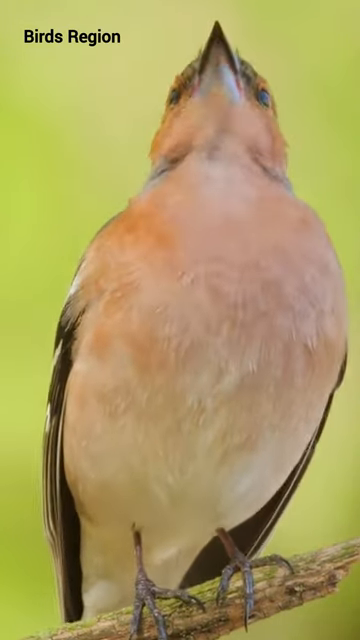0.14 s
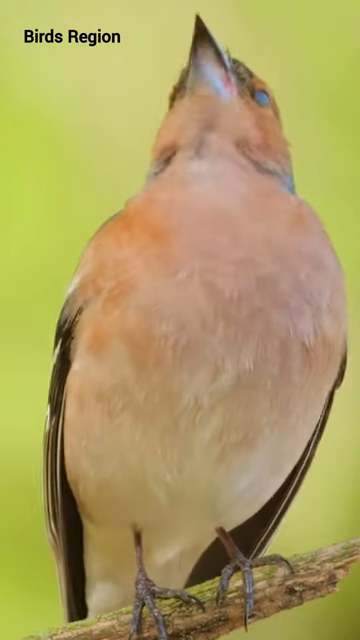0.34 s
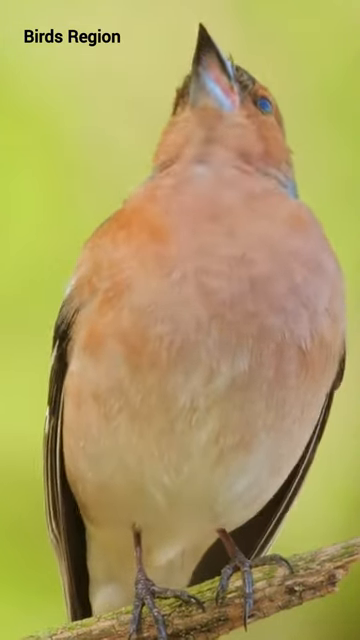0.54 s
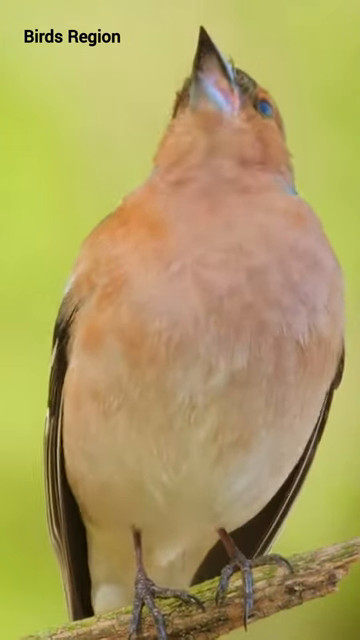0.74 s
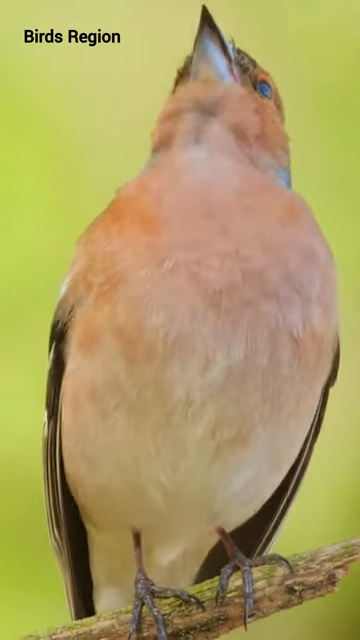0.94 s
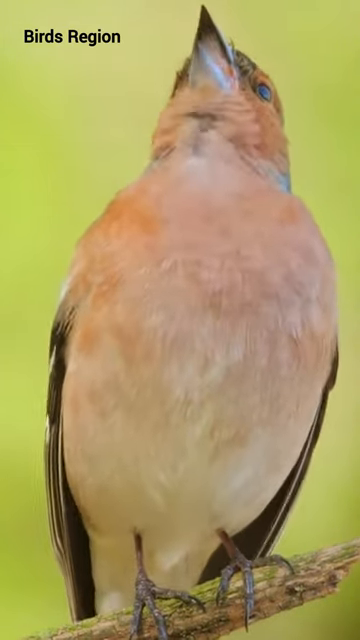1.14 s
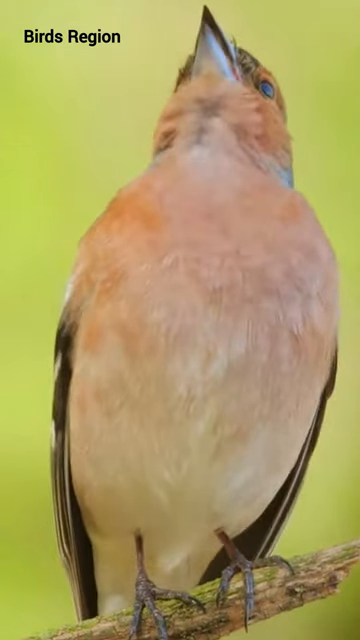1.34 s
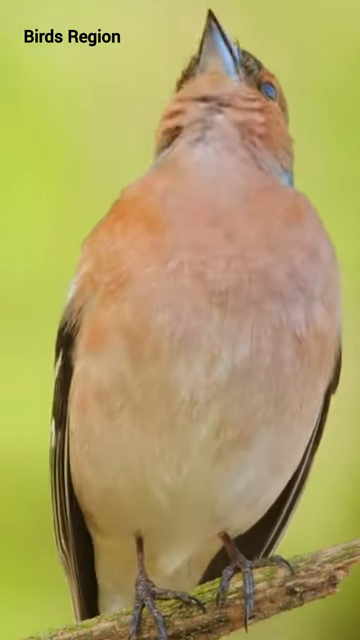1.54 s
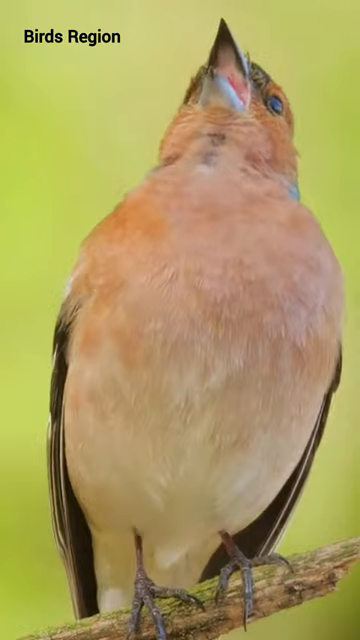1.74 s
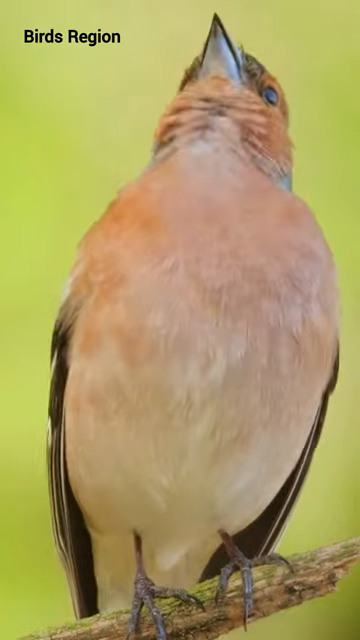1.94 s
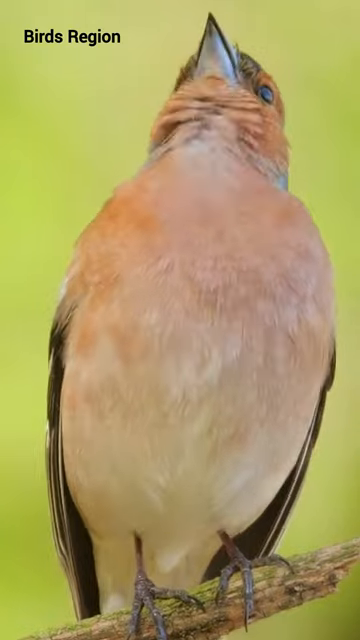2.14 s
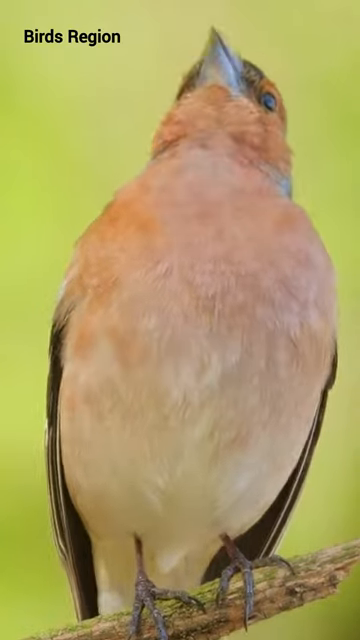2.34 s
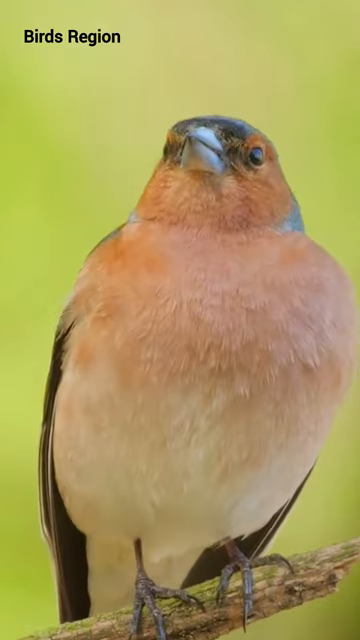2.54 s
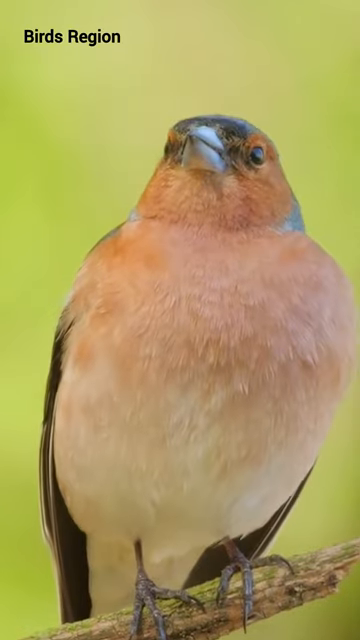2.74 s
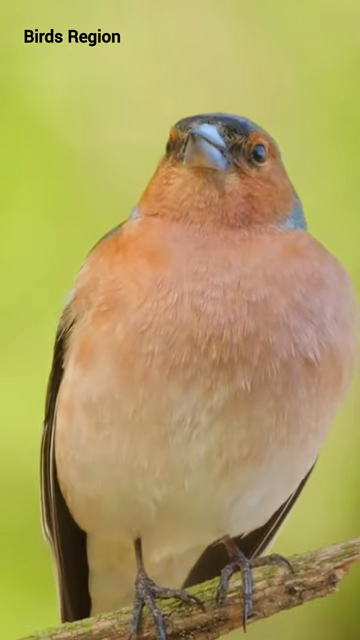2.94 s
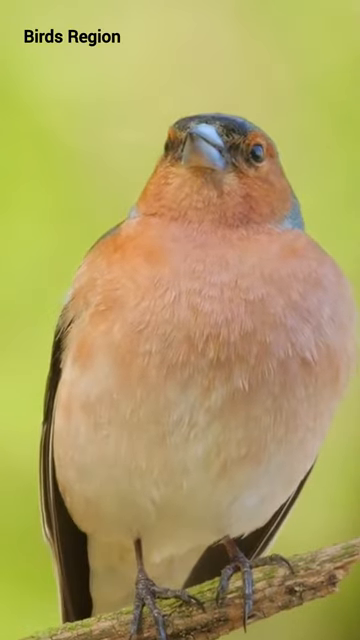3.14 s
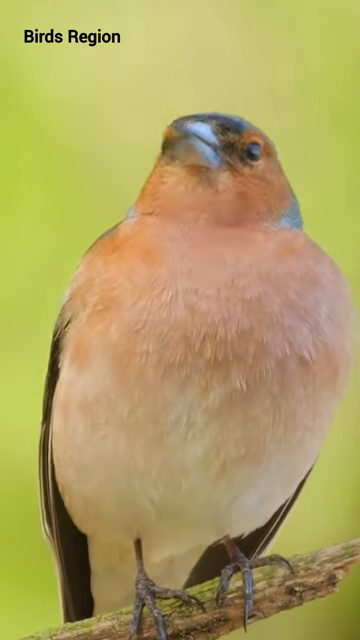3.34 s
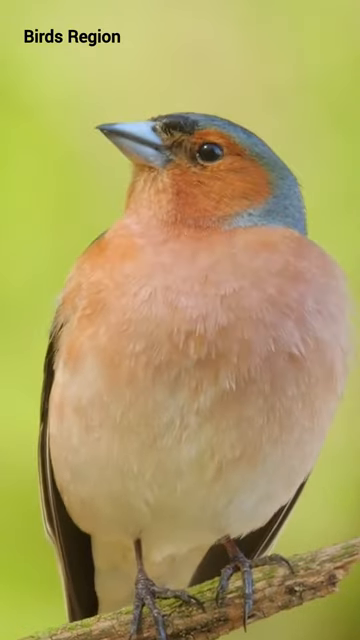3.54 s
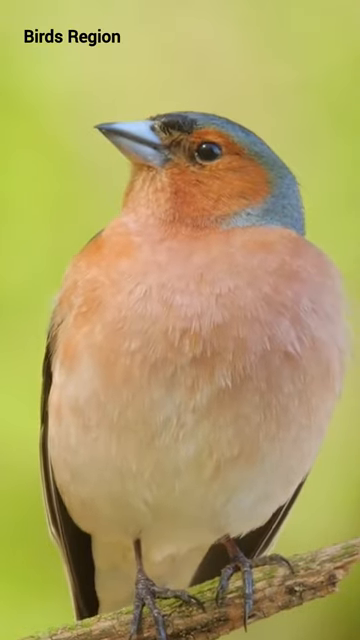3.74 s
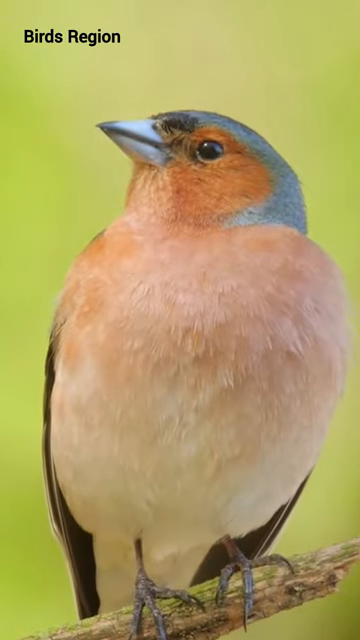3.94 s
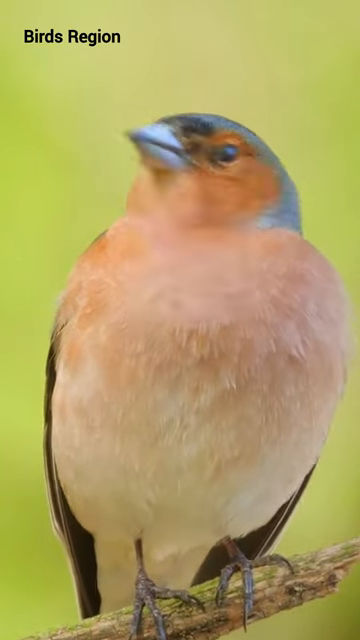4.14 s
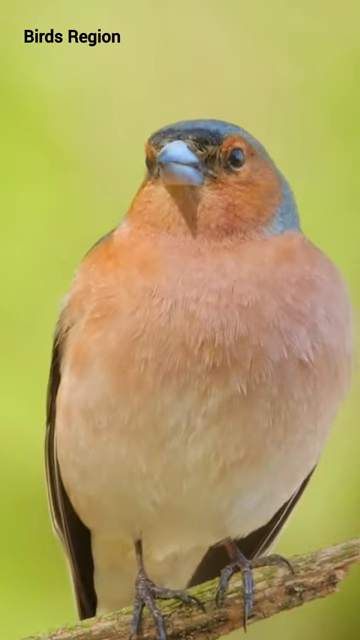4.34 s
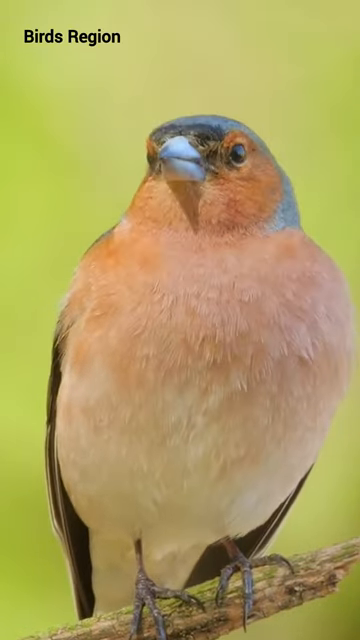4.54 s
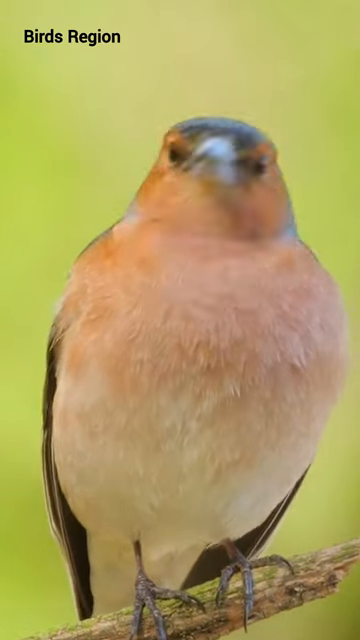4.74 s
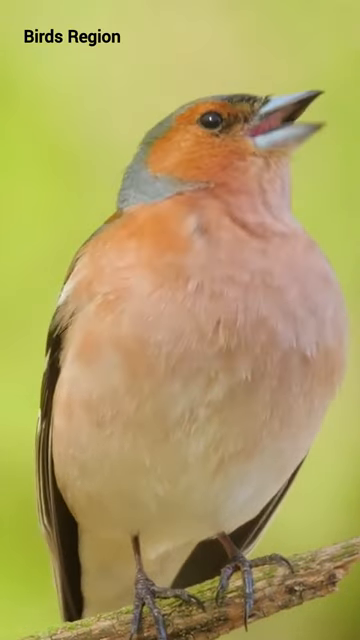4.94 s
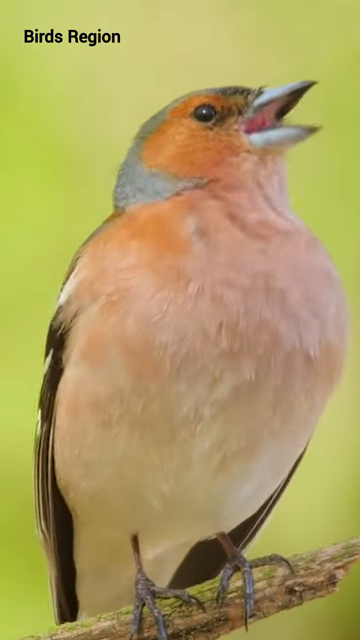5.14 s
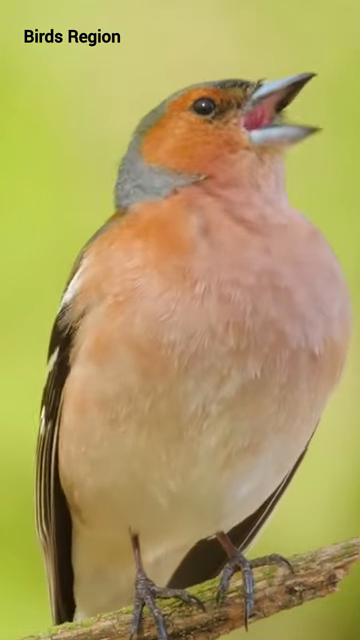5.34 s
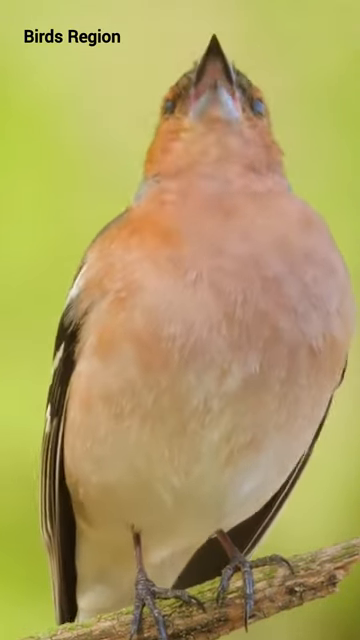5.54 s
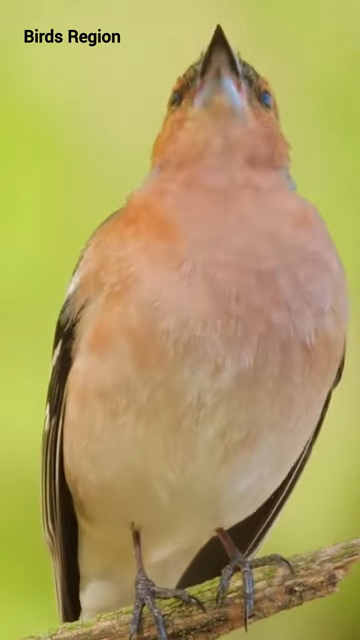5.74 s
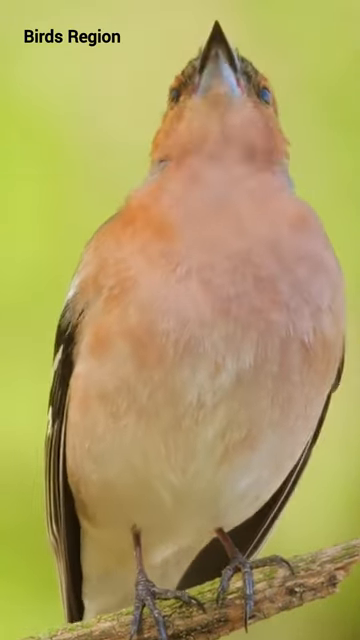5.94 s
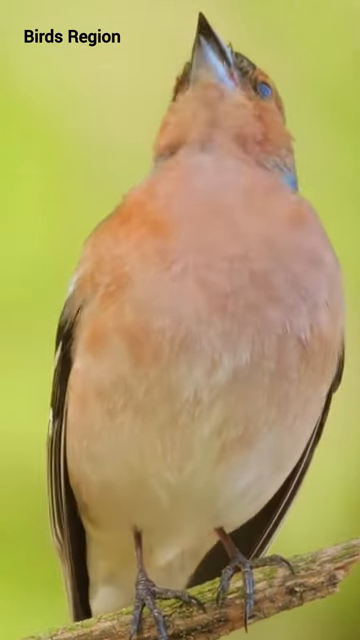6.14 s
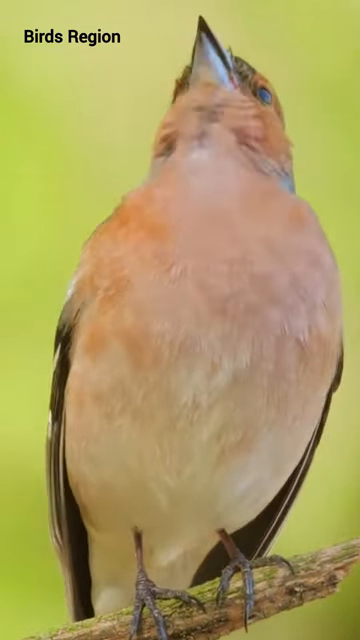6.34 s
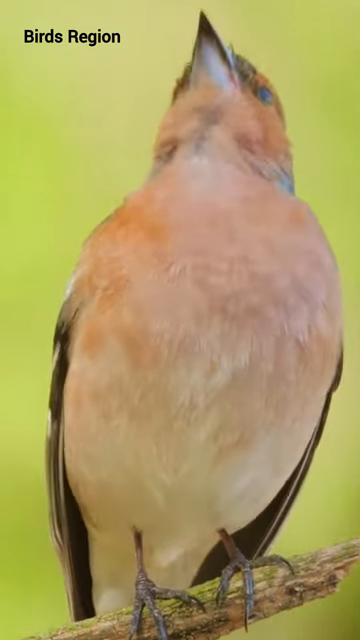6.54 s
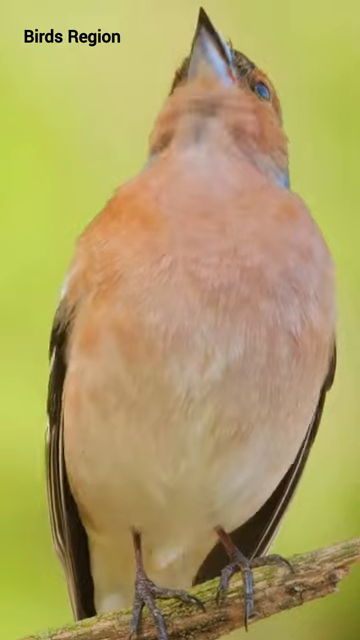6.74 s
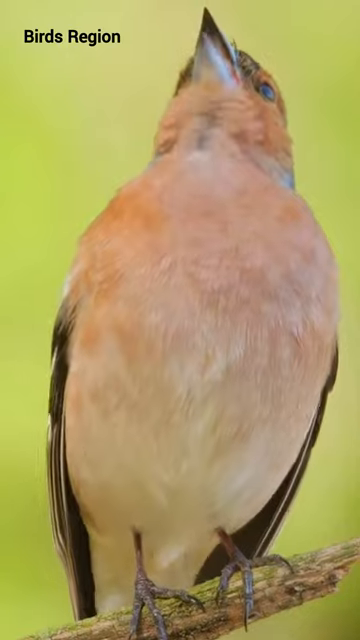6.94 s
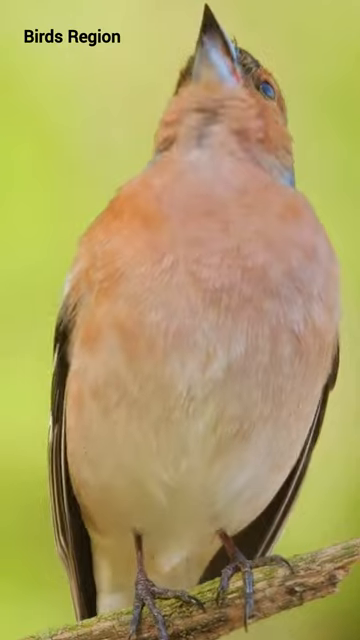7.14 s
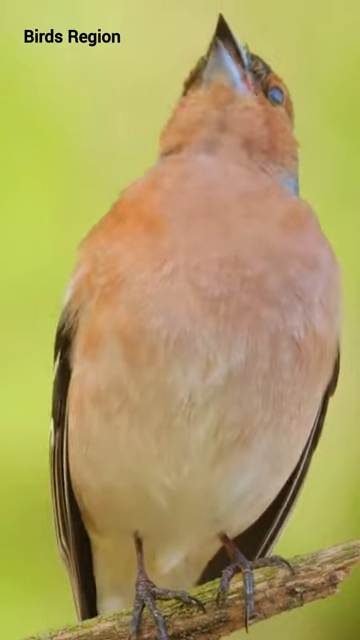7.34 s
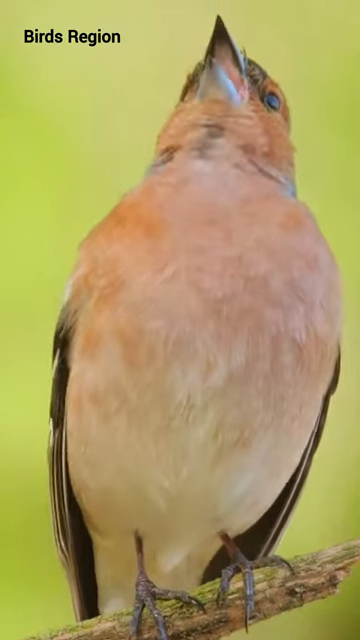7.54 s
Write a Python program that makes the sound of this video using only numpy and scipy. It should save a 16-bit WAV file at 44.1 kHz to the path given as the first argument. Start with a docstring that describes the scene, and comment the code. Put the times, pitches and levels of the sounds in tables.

```python
"""A chaffinch sings close by in a wood: thin ticks that swell, five steep down-slurs, hooked notes, a buzz and flourish.
Each run repeats one gliding whistle that stutters once or twice; branches, foliage and a trunk throw it back.
The first song, heard from its down-slurs on, stops abruptly with its ring; a soft twitter made of zigzags with
two-voiced endings follows, then the song comes round again from its ticks. Deeper in the wood lie faint slurs,
long whistles, one short high rustle and remote chirps, over a faint steady hush of coloured noise."""
import sys
import numpy as np
from scipy import signal
from scipy.fft import rfft, irfft
from scipy.io import wavfile
from scipy.ndimage import uniform_filter1d

SR = 44100
rng = np.random.default_rng(int(sys.argv[2]) if len(sys.argv) > 2 else 0)


def output_pcm(signal):
    """Save a mono or channel-first signal as 16-bit PCM at the path in sys.argv[1].

    Samples are clipped to [-1, 1] before scaling.
    """
    pcm = np.clip(np.atleast_2d(signal).T, -1, 1) * 32767
    wavfile.write(sys.argv[1], SR, np.round(pcm).astype(np.int16))


N = 338688

# Gesture shapes, named for how they sound: (share of the length [0-1], pitch before transposing [Hz], level [dB])
LISP = [(0, 5427, -3), (.25, 6113, 2.5), (.6, 6286, -3), (1, 6643, -12.5)]
SIGH = [(0, 2490, -16.5), (0.071, 3079, 1.5), (0.149, 3023, -4.5), (0.319, 2677, -4.5), (0.481, 2380, -12),
        (.68, 2300, -15), (0.796, 1750, -29.5), (1, 1150, -45)]
BUZZ = [(0, 4750, -12.5), (.2, 4374, -3.5), (.3, 4266, 3.5), (.58, 4000, 0.5), (1, 4000, -0.5)]
SQUEAK = [(0, 3370, 3), (.5, 5750, -8), (1, 7300, -26)]
FLOURISH = [(0, 3433, -15), (0.053, 3812, -2.5), (0.13, 3230, -6.5), (0.228, 2785, -9.5),
            (0.438, 2471, -19.5), (.57, 2900, -6.5), (0.797, 3284, -7), (1, 3380, -2.5)]
SLUR = [(0, 3712, -0.5), (0.602, 3360, -9.5), (1, 2610, -11)]
ARCH = [(0, 3500, -2), (0.251, 4420, -2), (0.551, 3600, -7.5), (1, 2514, -3)]
HIGH_SLUR = [(0, 4164, -14), (.35, 4190, -1), (.7, 3900, -2), (1, 3290, -12)]
LIFT = [(0, 3220, -5), (0.348, 3300, 0.5), (.7, 4100, 0.5), (1, 3950, -6)]
HOLD = [(0, 2110, 9.5), (.15, 1925, -9), (1, 1957, -15.5)]
ZIGZAG = [(0, 3550, -6), (.7, 3723, 7), (1, 3700, 5)]


def undb(db):
    """Decibels to gain."""
    return 10 ** (np.asarray(db) / 20)


def colour(x, points, share=1):
    """Filter by a (frequency [Hz], level [dB]) curve, or by a share of its decibels."""
    hz, db = np.transpose(points)
    bins_hz = np.maximum(np.arange(N // 2 + 1) * SR / N, 1)
    curve_db = np.interp(np.log(bins_hz), np.log(hz), db)
    return irfft(rfft(x) * undb(share * curve_db), N)


def wander(size, rate_hz):
    """Random drift around zero: straight lines between normal draws, rate_hz draws a second."""
    knots = rng.standard_normal(int(size * rate_hz / SR) + 2)
    return np.interp(np.arange(size) * rate_hz / SR, np.arange(len(knots)), knots)


def add(track, s, sound):
    """Mix a sound in at a time in seconds, trimming what falls outside the track."""
    start = int(s * SR)
    first, last = max(start, 0), min(start + sound.shape[-1], N)
    if last > first:
        track[..., first:last] += sound[..., first - start:last - start]


def stroke(shape, length_s, pitch=1, waver=0.0094, fade_s=0.0019):
    """One gesture, as a syrinx makes it: a pure tone that glides, and in some shapes trills."""
    # trills: (shape, rate [Hz], swing before transposing [Hz], softening at the top of the swing [0-1],
    # spread of the rate [0-1])
    trills = [(LISP, 300, 800, 0.58, 0.36), (BUZZ, 190, 590, 0.48, 0.25),
              (FLOURISH, 178, 433, 0.073, 0.067), (ZIGZAG, 90, 516, 0.12, 0.27)]
    size = int(length_s * SR)
    t = np.arange(size) / SR
    share, hz, db = np.transpose(shape)
    hz = uniform_filter1d(np.interp(t / length_s, share, hz), size=60)
    db = uniform_filter1d(np.interp(t / length_s, share, db), size=60)
    edges = np.clip(np.minimum(t, length_s - t) / fade_s, 0, 1)
    gain = undb(db) * np.sin(np.pi / 2 * edges) ** 2
    for trilled, rate_hz, swing_hz, dip, spread in trills:
        if shape == trilled:
            uneven_hz = rate_hz * (1 + spread * wander(size, rate_hz))
            swing = np.sin(2 * np.pi * np.cumsum(uneven_hz) / SR)
            hz = hz + swing_hz * swing
            gain = gain * (1 - dip * (1 + swing) / 2)
    sounding_hz = pitch * hz * (1 + waver * wander(size, 900))
    return gain * np.sin(2 * np.pi * np.cumsum(sounding_hz) / SR)


def stutter(sound, skips, fade_s=0.02):
    """At each skip the note jumps back a little and repeats itself, the old strand fading under the new."""
    for at_s, back_s in skips:
        gap = np.zeros(max(int(back_s * SR), 0))
        old = np.concatenate([sound, gap])
        new = np.concatenate([gap, sound])
        t = np.arange(len(old)) / SR
        turn = np.pi / 2 * np.clip((t - at_s) / fade_s + .5, 0, 1)
        sound = old * np.cos(turn) + new * np.sin(turn)
    return sound


def phrase():
    """One song cycle, dry: three runs that each repeat one stuttering whistle, and a closing figure."""
    # shapes of the three runs: (share of the length [0-1], pitch [Hz], level [dB])
    tick = [(0, 5300, -27.5), (0.252, 6630, -15.5), (.37, 6930, -24), (.42, 3695, -34), (.6, 4750, -15.5),
            (0.713, 4964, 1), (.81, 6003, -20.5), (0.879, 4310, -5.5), (1, 2745, -26)]
    plunge = [(0, 7620, -26), (.05, 7110, -22.5), (.15, 5254, -6), (.26, 4425, -6), (.51, 3975, -3),
              (.66, 3553, 2), (.86, 2991, -3), (.92, 2398, -19), (1, 1197, -45)]
    hook = [(0, 2330, -13.5), (.24, 2910, -4.5), (.5, 3590, 1), (0.551, 4470, -12), (.6, 4810, -17.5),
            (0.707, 3470, 1), (.79, 2970, -0.5), (.88, 2420, -16.5), (1, 1136, -44)]
    # notes of the runs: (time [s], level [dB], stutters [(time into the note [s], skip back [s])])
    ticks = [(5.063, -35.5, [(.023, .008)]), (5.169, -27.5, [(.035, 0.012)]), (5.282, -25, [(.045, 0.011)]),
             (5.381, -20, [(.012, .017), (.063, 0.024)]), (5.486, -20, [(.043, 0.0091)]),
             (5.588, -18.5, [(.031, 0.015), (.059, 0.016)]), (5.697, -16, [(.037, .018)])]
    plunges = [(.133, -17, [(.039, .012), (.091, .021)]), (.345, -16.5, [(.033, .019), (.085, .014)]),
               (.571, -15, [(.033, .018), (.093, .018)]), (.798, -14.5, [(.029, .01), (.075, .013)]),
               (1.026, -14, [(.053, .014), (.102, 0.02)])]
    hooks = [(1.222, -14.5, [(.045, .014)]), (1.383, -14, [(.021, 0.0072), (.047, .013)]),
             (1.543, -13, [(.023, .017), (.072, .019)])]
    # closing figure: (time [s], length [s], level [dB], transposition [ratio], shape)
    closing = [(1.727, .14, -13.5, 1, SIGH), (1.943, 0.17, -17, 1, BUZZ), (2.186, .014, -34, 1, SQUEAK),
               (2.204, 0.018, -29.5, 1, SQUEAK), (2.207, 0.018, -36, .62, SQUEAK),
               (2.216, 0.16, -14.5, 1, FLOURISH)]
    tick_s, plunge_s, hook_s = .041, 0.075, .0604  # lengths before stuttering
    lisp_lead_s, lisp_s, lisp_db = 0.054, .056, -18.5  # thin lead-in; level relative to its plunge

    voice = np.zeros(N)
    for notes, shape, length_s in ((ticks, tick, tick_s), (plunges, plunge, plunge_s), (hooks, hook, hook_s)):
        for s, db, skips in notes:
            add(voice, s, undb(db) * stutter(stroke(shape, length_s), skips))
    for s, db, _ in plunges:
        add(voice, s - lisp_lead_s, undb(db + lisp_db) * stroke(LISP, lisp_s))
    for s, length_s, db, pitch, shape in closing:
        add(voice, s, undb(db) * stroke(shape, length_s, pitch))
    return voice


def overtones(voice, second_db=-41, third_db=-42, fourth_db=-57, growth=.4):
    """Harmonics at multiples of the whistle's phase, which gain on it as it gets louder."""
    # tone of the overtones as they leave the beak: (frequency [Hz], level [dB])
    beak = [(5000, -11.5), (8000, -8), (9200, -20.5), (10400, 2), (12500, 12), (15000, 7)]
    tone = signal.hilbert(voice)
    size, phase = np.abs(tone), np.angle(tone)
    harmonics = sum(undb(db) * np.cos(k * phase) for k, db in enumerate((second_db, third_db, fourth_db), 2))
    return colour(size * (size / size.max()) ** growth * harmonics, beak)


def wood(x, scatter_db, t60=0.65, treble_t60=0.3, treble_hz=4800, side_db=-14):
    """Direct sound, a few clear echoes and a grainy tail from leaves and twigs, nearly alike in both ears."""
    # branches close by: (delay [s], level [dB])
    branches = [(.0014, -18), (.00272, -12), (0.0109, -13.5)]
    trunk_s, trunk_db = 0.077, -23.5  # a later, duller echo
    t = np.arange(SR) / SR
    low_pass = signal.butter(2, treble_hz, fs=SR, output="sos")

    grains = rng.standard_normal((2, SR)) * (rng.random((2, SR)) < .03)
    twigs = grains * (t > branches[0][0])
    low = signal.sosfiltfilt(low_pass, twigs)
    # foliage swallows the treble first
    low_tail = low * np.exp(-np.log(1000) * t / t60)
    treble_tail = (twigs - low) * np.exp(-np.log(1000) * t / treble_t60)
    tail = low_tail + treble_tail
    mid, side = tail * undb(scatter_db) / np.sqrt(np.sum(tail ** 2, axis=1, keepdims=True))

    trunk = signal.unit_impulse(SR, int(trunk_s * SR))
    mid = mid + undb(trunk_db) * signal.sosfiltfilt(low_pass, trunk)
    mid[0] += 1  # direct sound
    for delay_s, db in branches:
        mid[int(delay_s * SR)] += undb(db)
    return np.array([signal.fftconvolve(x, mid + sign * undb(side_db) * side)[:N] for sign in (1, -1)])


def chaffinch():
    """The same song comes round at a steady interval; the first breaks off together with its ring."""
    repeat_s, break_s, resume_s = 5.7256, 2.381, 5
    voice, songs = phrase(), np.zeros((2, N))
    song = wood(voice, scatter_db=-12, treble_t60=.38)
    # the raised beak beams the overtones into the leaves, so they arrive mostly scattered
    song = song + wood(overtones(voice), scatter_db=5.5, treble_t60=0.044)
    for turn in (-1, 0, 1):
        add(songs, turn * repeat_s, song)
    t = np.arange(N) / SR
    audible = 1. * ((t < break_s) | (t > resume_s))
    return songs * uniform_filter1d(audible, size=4)


def distant_sounds(chorus_db=-80, count=70):
    """Faint slurs, long whistles, a short high rustle and remote chirps, much of each scattered by the trees."""
    # faint slurs, long whistles (HOLD) and one short high rustle (ZIGZAG):
    # (time [s], length [s], level [dB], transposition [ratio], shape)
    faint = [(2.421, 0.083, -62.5, 1, SLUR), (2.51, 0.23, -68, .96, HOLD), (3.443, 0.028, -69, 3.1, ZIGZAG),
             (3.888, 0.047, -65, 1.55, SLUR), (4.0, 0.049, -72, 1.45, SLUR), (4.519, .05, -57.5, .82, SLUR),
             (4.679, 0.84, -72, 1.1, HOLD)]
    voice = np.zeros(N)
    for s, length_s, db, pitch, shape in faint:
        add(voice, s, undb(db) * stroke(shape, length_s, pitch, waver=0.034))
    for when, pitch, size in rng.random((count, 3)):
        chirp = stroke(SLUR, .04, .65 + pitch / 2)
        add(voice, when * N / SR, undb(chorus_db) * size * chirp)
    return wood(voice, scatter_db=-3)


def air(level_db=-70.5, side_db=-20):
    """A faint, steady hush of leaves and microphone hiss: one coloured noise, nearly mono."""
    # spectrum of the hush: (frequency [Hz], relative density [dB per Hz])
    hush = [(59, -60.5), (100, -25), (411, -11), (541, -7), (998, -6), (1660, -8.5), (2520, -2.5),
            (2750, 0), (5870, -8.5), (7100, -10), (15500, -7)]
    mid, side = colour(rng.standard_normal((2, N)), hush)
    return undb(level_db) * (mid + undb(side_db) * side * np.array([[1], [-1]])) / np.std(mid)


def twitterer(zigzag_s=0.04, ending_s=.058, overlap_s=0.0074, zigzag_db=-2, ending_db=-1.0):
    """Soft scratchy twitters, no two alike; the two sides of the syrinx end on different pitches."""
    # syllables: (time [s], level before the zigzag and ending trims [dB], upper voice, lower voice)
    syllables = [(2.66, -57, HIGH_SLUR, SLUR), (2.802, -60.5, HIGH_SLUR, SLUR),
                 (2.957, -60.5, HIGH_SLUR, SLUR), (3.105, -54.5, HIGH_SLUR, SLUR),
                 (3.246, -53, HIGH_SLUR, SLUR), (3.383, -51.5, HIGH_SLUR, SLUR),
                 (3.521, -51.5, HIGH_SLUR, SLUR), (3.633, -62, HIGH_SLUR, SLUR), (4.669, -53.5, ARCH, LIFT),
                 (4.798, -55, ARCH, LIFT), (4.925, -56, ARCH, LIFT), (5.051, -56, ARCH, LIFT),
                 (5.17, -55, ARCH, LIFT), (5.29, -56.5, ARCH, LIFT), (5.555, -49, ARCH, LIFT),
                 (5.695, -49.5, ARCH, LIFT)]
    voice = np.zeros(N)
    for s, db, upper, lower in syllables:
        pitch, pace = rng.uniform(.97, 1.02), rng.uniform(.85, 1.15)
        zigzag = stroke(ZIGZAG, zigzag_s * pace, pitch, waver=.03)
        add(voice, s, undb(db + zigzag_db) * zigzag)
        for shape in (upper, lower):
            ending = stroke(shape, ending_s * rng.uniform(.75, 1.15), pitch * rng.uniform(.92, 1.03), waver=.014)
            add(voice, s + zigzag_s * pace - overlap_s, undb(db + ending_db) * ending)
    voice = voice + overtones(voice, second_db=-9.5, third_db=-45, fourth_db=-55)
    return wood(voice, scatter_db=-20)


def scene():
    """All the wood's sounds over the air; they lean a little left or right with their pitch."""
    # lean to the left, shared out unevenly between the sides below: (frequency [Hz], lean [dB])
    lean = [(1300, 3), (2800, 2.5), (4200, -0.03), (12000, 0.1)]
    sounds = chaffinch() + twitterer() + distant_sounds()
    left = colour(sounds[0], lean, 0.3)
    right = colour(sounds[1], lean, -.5)
    return np.array([left, right]) + air()


def record(dry):
    """A steep elliptic low-pass cuts the extreme treble, as the recorder does."""
    top_hz = 15450
    low_pass = signal.ellip(10, .1, 80, top_hz, fs=SR, output="sos")  # order, ripple dB, stopband dB
    return signal.sosfilt(low_pass, dry)


dry = scene()
out = record(dry)
output_pcm(out)
```